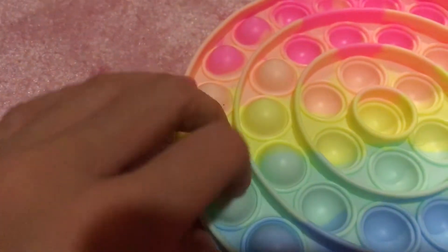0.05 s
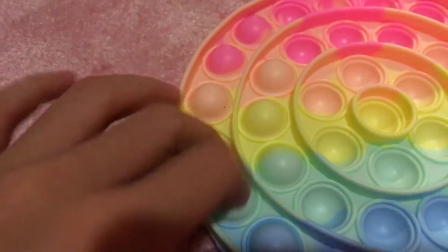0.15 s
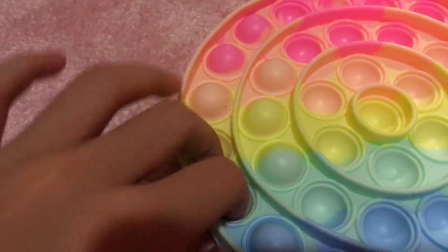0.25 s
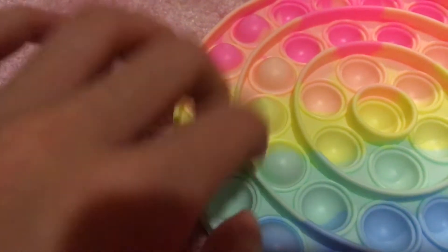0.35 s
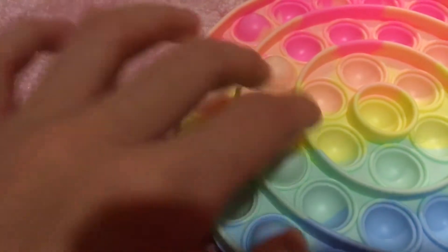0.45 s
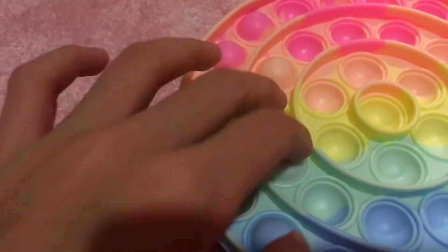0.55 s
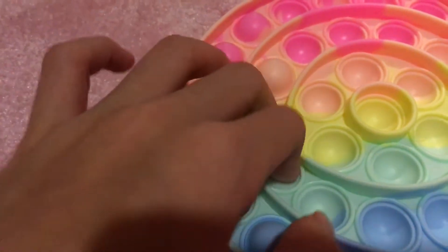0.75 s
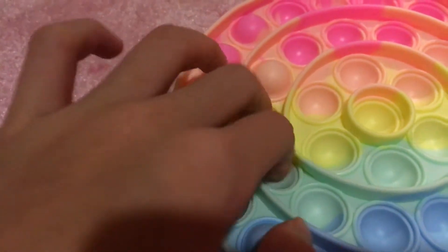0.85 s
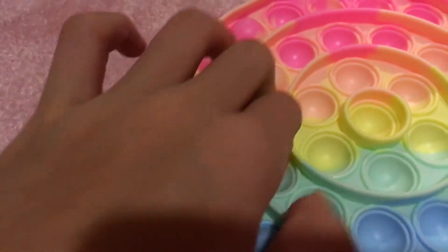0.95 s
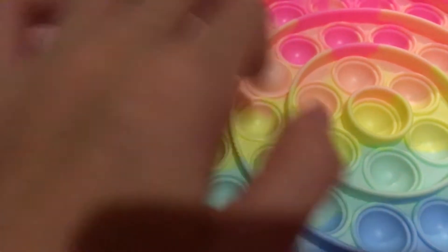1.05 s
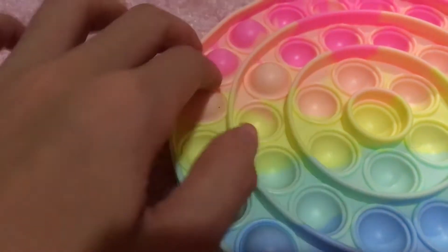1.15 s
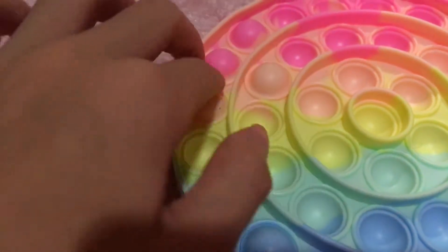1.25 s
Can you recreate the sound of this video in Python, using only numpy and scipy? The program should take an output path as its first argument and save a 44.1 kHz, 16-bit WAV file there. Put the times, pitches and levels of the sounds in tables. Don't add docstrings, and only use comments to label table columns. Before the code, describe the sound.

A silicone popping toy is pressed by fingers: a strong snappy pop with a low thud, a pause with soft pushes, a lighter pop, then a faint last one, close microphone, quiet carpeted room.

```python
import sys
import numpy as np
from scipy import signal
from scipy.fft import rfft, irfft, next_fast_len
from scipy.io import wavfile
from scipy.ndimage import map_coordinates

SR = 44100
rng = np.random.default_rng(int(sys.argv[2]) if len(sys.argv) > 2 else 0)


def digitize_waveform(pressure):
    field = np.atleast_2d(pressure).T
    bounded = np.clip(field, -1, 1)
    quanta = np.round(bounded * 32767).astype(np.int16)
    wavfile.write(sys.argv[1], SR, quanta)


def gain_from_decibels(decibels):
    exponent = np.asarray(decibels, float) / 20
    return 10 ** exponent


N = 57330


def along(points, hz):
    point_hz, value = np.transpose(points)
    return np.interp(np.log(hz + 1), np.log(point_hz + 1), value)


def filtered(x, response):
    size = next_fast_len(N + SR // 2)
    hz = np.fft.rfftfreq(size, 1 / SR)
    return irfft(rfft(x, size) * response(hz), size)[:N]


def noise(spectrum):
    x = filtered(rng.standard_normal(N), lambda hz: gain_from_decibels(along(spectrum, hz)))
    return x / np.sqrt(np.mean(x ** 2) + 1e-20)


def since(start_s):
    return np.maximum(np.arange(N) / SR - start_s, 0)


# (frequency [Hz], density [dB per Hz])
RUMBLE_SPECTRUM = [(20, -58), (32, -35), (50, -7), (100, -2), (200, -5), (330, -11), (480, -19.5),
                   (900, -37.5)]
# (frequency [Hz], density [dB per Hz])
HISS_SPECTRUM = [(150, -39), (450, 0), (800, -1), (1500, -3.5), (3600, -10), (8000, -16), (12000, -20),
                 (15700, -30.5)]
# (time [s], level [dB])
HAND_WEIGHT = [(0, -1), (.3, 1), (.5, -1), (.65, 0), (.85, -0.5), (1.0, 1.5), (1.3, -2)]


def background():
    rumble_db, hiss_db, lump_db = -61.5, -70.5, 1.3
    drift_db = np.interp(np.arange(N) / SR, *np.transpose(HAND_WEIGHT))
    lumps_db = lump_db * map_coordinates(rng.standard_normal(60), [np.linspace(1, 55, N)])
    rumble = gain_from_decibels(rumble_db + drift_db + lumps_db) * noise(RUMBLE_SPECTRUM)
    hiss = gain_from_decibels(hiss_db) * noise(HISS_SPECTRUM)
    return rumble + hiss


# (time [s], level [dB], final pitch [Hz], t60 [s], extra pitch at contact [ratio])
THUD_EVENTS = [
    (0.2396, -43, 248, 0.049, 0.21),
    (0.2530, -27.5, 108.5, 0.0443, 0.38),
    (0.39, -52.5, 197, 0.096, 0.12),
    (0.5777, -44, 107.3, 0.18, 3),
    (0.6138, -36, 131, 0.035, 1.4),
    (0.7325, -51.5, 242, 0.092, 0.56),
    (0.7472, -39.5, 397, 0.016, 0.19),
    (0.7560, -53, 213, 0.037, 0.11),
    (0.914, -35, 168, 0.021, 1.5),
    (0.9180, -38.5, 175, 0.054, 0.063),
]


def thud(start_s, level_db, final_hz, t60_s, extra_pitch):
    sag_s, attack_s = 0.0027, 0.00069
    t = since(start_s)
    turns = final_hz * (t + extra_pitch * sag_s * (1 - np.exp(-t / sag_s)))
    attack = 1 - np.exp(-t / attack_s)
    return gain_from_decibels(level_db - 60 * t / t60_s) * np.sin(2 * np.pi * turns) * attack


# (time [s], level [dB], direction [+1/-1], ring before damping [s])
SNAP_EVENTS = [
    (0.2397, -46, 1, .003),
    (0.2487, -27, 1, .004),
    (0.2497, -31, -1, .002),
    (0.2497, -27, -1, .0107),
    (0.2500, -25, 1, .0105),
    (0.7508, -30, -1, .004),
    (0.7507, -33, -1, .0047),
    (0.7555, -44, 1, .012),
    (0.9145, -42, 1, .003),
    (0.9144, -42, 1, .008),
]
# (frequency [Hz], level [dB], t60 [s])
SNAP_MODES = [
    [(462, 9.5, 0.074), (1170, 1.5, 0.016), (3100, 1, 0.0079), (4540, -6, 0.01)],
    [(1202, -0.5, 0.027), (1620, -0.5, 0.015), (2080, -18, 0.045), (3400, -2, 0.005)],
    [(3350, 5.5, 0.0066), (4570, -3.5, 0.01), (6000, -7, 0.0069), (6580, -9.5, 0.012)],
    [(380, 0, .055), (545, -1, .05)],
    [(190, 0, .07)],
    [(1003, -4.5, 0.09), (1450, 4, 0.014), (1658, -3.5, 0.011), (2400, -5.5, 0.017), (2810, -12, 0.017),
     (3440, -10, 0.01)],
    [(270, 2, 0.069), (587, 1, 0.02), (807, -0.5, 0.082)],
    [(786, -3, 0.16), (1034, -4, 0.054), (1766, -15, .06)],
    [(1150, -3, .022), (1405, 0, .024), (1712, -6, .02), (3531, -13, .012)],
    [(404, 1, 0.078), (584, -6, 0.12), (724, -12.5, 0.09)],
]


def snap(start_s, level_db, direction, free_s, modes):
    attack_s, damping_s = 0.00061, 0.00049
    t = since(start_s)
    ring = sum(gain_from_decibels(mode_db - 60 * t / t60_s) * np.sin(2 * np.pi * hz * t) for hz, mode_db, t60_s in modes)
    attack = 1 - np.exp(-t / attack_s)
    damped = np.exp(-np.maximum(t - free_s, 0) / damping_s)
    return direction * gain_from_decibels(level_db) * ring * attack * damped


# (peak time [s], level [dB], rise [s], fall [s])
PEEL_EVENTS = [
    (0.2398, -46, .0001, .0009),
    (0.2476, -44, .0004, .0015),
    (0.2489, -41, .0005, .0012),
    (0.2502, -41, .0003, .001),
    (0.2540, -58, .001, .001),
    (0.7333, -62, .0002, .0008),
    (0.7476, -56, .0002, .001),
    (0.7505, -42, .0004, .0005),
    (0.9140, -53, .0003, .0012),
    (0.9175, -53, .0005, .0007),
]
# (frequency [Hz], level [dB])
SKIN_SPECTRUM = [(2000, -40), (5000, -1.5), (7300, -15.5), (8400, 0), (9500, -7), (10800, 3), (12500, -11),
                 (15000, -5)]


def peels():
    t = np.arange(N) / SR
    envelope = np.zeros(N)
    for peak_s, level_db, rise_s, fall_s in PEEL_EVENTS:
        decay = np.where(t < peak_s, (peak_s - t) / rise_s, (t - peak_s) / fall_s)
        envelope += gain_from_decibels(level_db) * np.exp(-decay)
    return envelope * noise(SKIN_SPECTRUM)


# (frequency [Hz], t60 [s])
ROOM_DECAY = [(100, 0.067), (400, 0.25), (1200, 0.21), (3000, 0.25), (8000, 0.17), (14000, 0.087)]
# (frequency [Hz], level [dB])
REFLECTION_COLOUR = [(100, -12), (300, -2), (700, -4), (1300, 4), (2600, -0.5), (3500, -7), (7000, -2),
                     (12000, -14.5)]


def room(x):
    wall_s, wall_db, flutter_loss_db = 0.0178, -16, 6
    tail_gap_s, tail_rise_s, tail_db = 0.007, 0.002, -12
    hz, t, z = signal.stft(rng.standard_normal(SR // 2), SR, nperseg=256)
    decay = gain_from_decibels(-60 * t / along(ROOM_DECAY, hz)[:, None])
    tail = signal.istft(z * decay, SR, nperseg=256)[1]
    tail = tail * (1 - np.exp(-np.arange(len(tail)) / SR / tail_rise_s))
    tail = gain_from_decibels(tail_db) * tail / np.linalg.norm(tail)
    answer = np.pad(tail, (round(tail_gap_s * SR), 0))
    trips = np.arange(5)
    echo_at = np.round((trips + 1) * wall_s * SR).astype(int)
    answer[echo_at] += gain_from_decibels(wall_db - flutter_loss_db * trips)
    wet = signal.fftconvolve(x, answer)[:N]
    return filtered(wet, lambda hz: gain_from_decibels(along(REFLECTION_COLOUR, hz)))


def scene():
    low_cut_hz = 80
    quiet = background()
    thuds = sum(thud(*event) for event in THUD_EVENTS)
    snaps = sum(snap(*event, modes) for event, modes in zip(SNAP_EVENTS, SNAP_MODES))
    toy = snaps + thuds + peels()
    toy = filtered(toy, lambda hz: hz ** 2 / (low_cut_hz ** 2 + hz ** 2))
    t = np.arange(N) / SR
    first, second, last = t < 0.5, (t >= 0.5) & (t < 0.85), t >= 0.85
    wet = room(toy * first) + room(toy * second) + room(toy * last)
    return (toy + wet + quiet)[None]


def low_pass(x):
    return signal.sosfilt(signal.butter(12, 16400, fs=SR, output="sos"), x)


def record(dry):
    top_hz, edge_hz, edge_db = 15750, 110, -11
    mix = filtered(dry[0], lambda hz: gain_from_decibels(edge_db) ** np.clip((hz - top_hz) / edge_hz, 0, 12))
    return low_pass(mix[None])


dry = scene()
out = record(dry)
digitize_waveform(out)
```